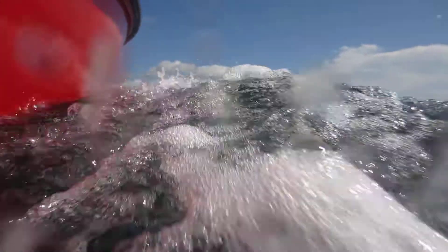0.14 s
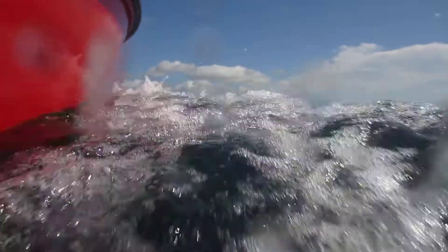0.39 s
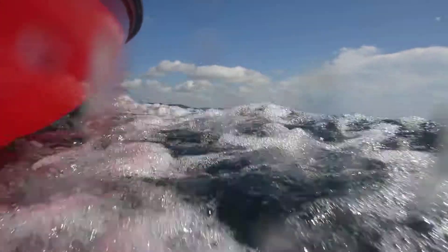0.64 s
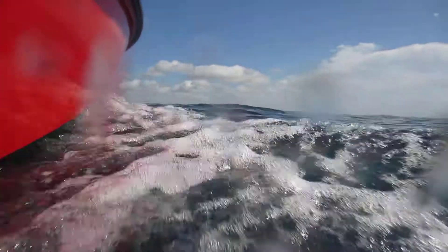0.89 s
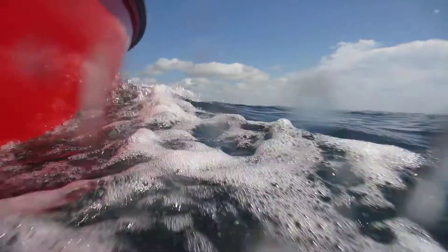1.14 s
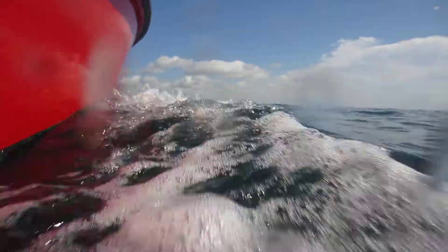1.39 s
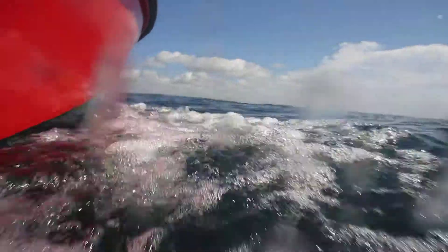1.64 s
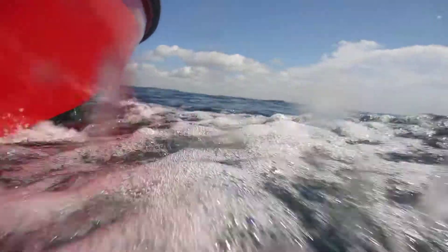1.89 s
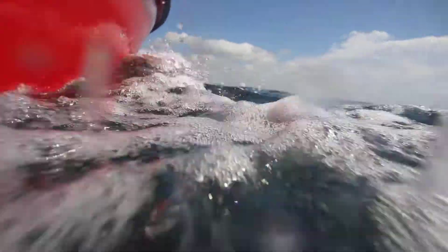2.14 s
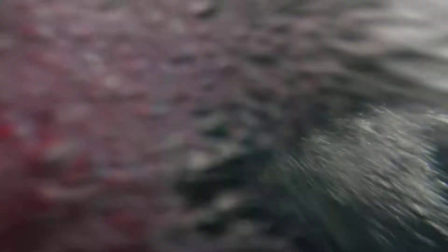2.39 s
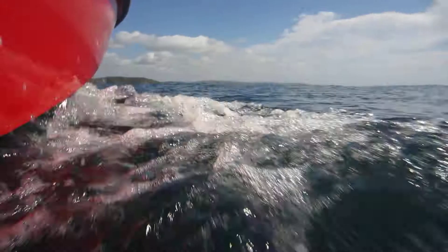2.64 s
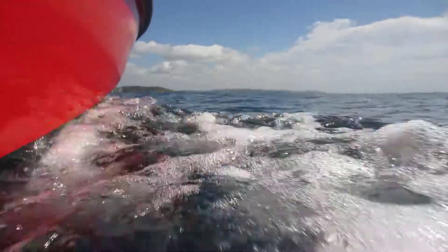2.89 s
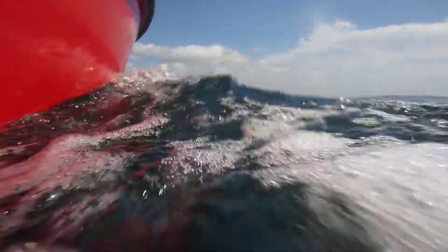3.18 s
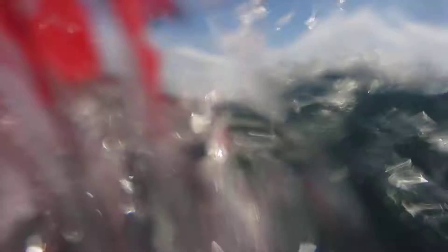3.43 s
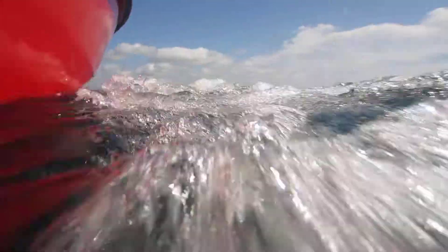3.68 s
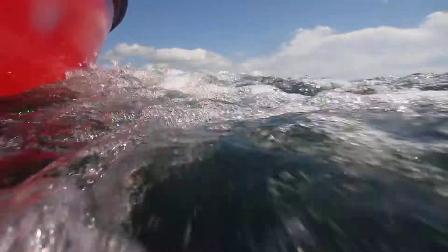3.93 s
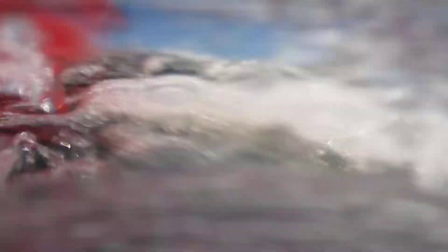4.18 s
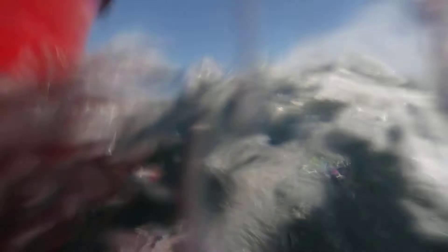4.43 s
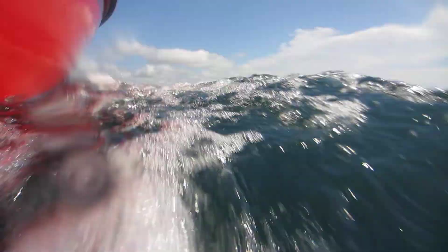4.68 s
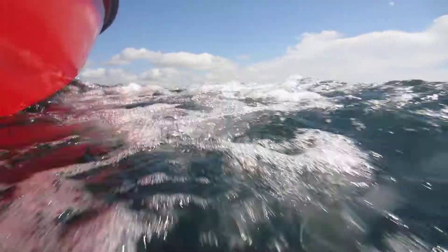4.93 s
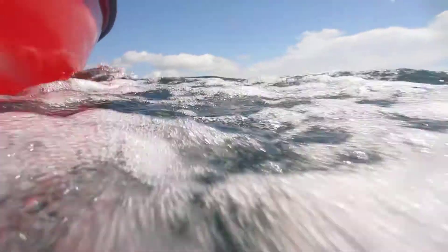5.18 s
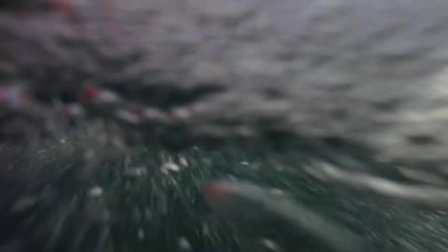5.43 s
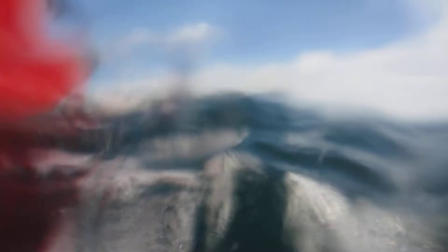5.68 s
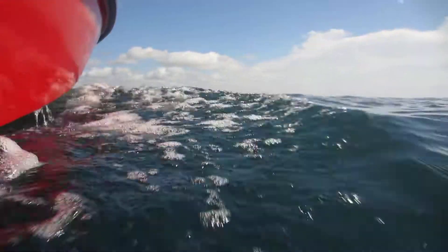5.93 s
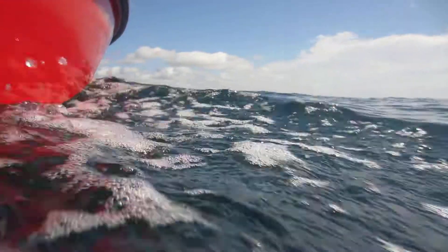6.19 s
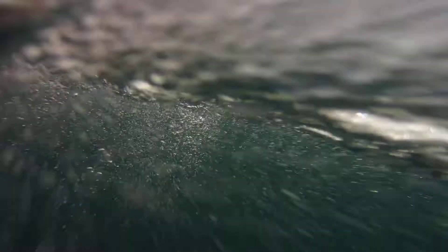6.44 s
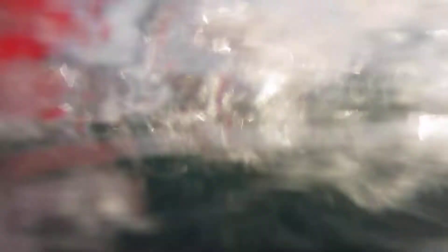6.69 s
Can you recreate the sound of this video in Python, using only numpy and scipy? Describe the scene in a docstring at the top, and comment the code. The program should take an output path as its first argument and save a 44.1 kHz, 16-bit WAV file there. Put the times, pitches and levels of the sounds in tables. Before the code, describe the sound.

Right at the waterline beside a speeding boat, heard from inside a waterproof housing. A low wavering engine hum sits under a steady, foamy rush for two seconds. Then waves hit the housing with hard slaps, short hiss bursts and ringing bubbles. The rush drops much quieter between hits, with droplets trickling. Splashes grow denser, and finally trapped air gurgles at the microphone.

```python
"""Just above the sea beside the hull of a fast boat, heard from inside a waterproof housing.
Coloured noise and foam bubbles make the rush of the bow wave over the engine's wavering orders.
Waves then drench the housing: gusts of hiss, swarms of bubbles, low pushes and single slaps whose
trapped bubbles ring. The rush is much quieter after loud splashes. At the end an air pocket at the
microphone gurgles as a resonator excited by noise."""
import sys
import numpy as np
from scipy import signal
from scipy.fft import rfft, irfft, next_fast_len
from scipy.io import wavfile
from scipy.ndimage import uniform_filter1d

SR = 44100
rng = np.random.default_rng(int(sys.argv[2]) if len(sys.argv) > 2 else 0)


def decibels_to_gain(level_db):
    """Convert a level in decibels to a linear amplitude gain (20 dB per decade)."""
    exponent = np.asarray(level_db, float) / 20
    return 10 ** exponent


def waveform_to_disk(signal):
    """Save audio, clipped to [-1, 1], as 16-bit WAV at the path in sys.argv[1]."""
    frames = np.transpose(np.atleast_2d(signal))
    scaled = np.clip(frames, -1, 1) * 32767
    samples = np.round(scaled).astype(np.int16)
    wavfile.write(sys.argv[1], SR, samples)


N = 301185
BODY, BRIGHT = (800, 3000), (3000, 10000)  # bands that set the levels of rush and waves, Hz


def evened(x):
    """Normalization: scales x to rms 1."""
    return x / np.sqrt(np.mean(x ** 2) + 1e-20)


def read(points, hz):
    """Spectral envelope: interpolates a table on a log-frequency axis."""
    f, value = np.transpose(points)
    return np.interp(np.log(hz + 1), np.log(f + 1), value)


def curve(rows, column):
    """Temporal envelope: one table column at every sample, joined by straight lines."""
    rows = np.array(rows)
    return np.interp(np.arange(N) / SR, rows[:, 0], rows[:, column])


def bumps(modes, hz):
    """Resonance: the summed gain of peaks, each given as (Hz, width Hz, dB)."""
    return sum(decibels_to_gain(db) / np.sqrt(1 + (2 * (hz - f) / width) ** 2) for f, width, db in modes)


def noise(gain, size, patchy_db, flicker_db, span):
    """Turbulence: two unrelated noises of one colour share drifting patches and a wide-band flicker."""
    hz = np.fft.rfftfreq(size, 1 / SR)
    frames = 4 * N // size + 5
    a, b, c, d, patches = rng.standard_normal((frames, len(hz), 5)).T
    # smoothed along both frequency and time
    patches = evened(uniform_filter1d(uniform_filter1d(patches, span, 0), span, 1))
    flicker = evened(uniform_filter1d(rng.standard_normal(frames), size=2))
    unevenness = decibels_to_gain(patchy_db * patches + flicker_db * flicker)
    spectra = np.array([a + 1j * b, c + 1j * d]) * gain(hz)[:, None] * unevenness
    return evened(signal.istft(spectra, nperseg=size, noverlap=3 * size // 4)[1][:, :N])


def bubble(hz, t60, half_climb, soft_s):
    """Damped bubble oscillation: pitch climbs near the surface; complex, to serve both channels."""
    t = np.arange(int(t60 * SR) + 8) / SR
    turns = hz * t * (1 + half_climb * t / t60)  # the pitch climbs by twice this share within t60
    return np.exp(2j * np.pi * turns) * decibels_to_gain(-60 * t / t60) * (1 - np.exp(-t / soft_s))


def bubbles(colour, per_s, cycles, spread_db, low_hz=300, high_hz=14000, count=26):
    """Random superposition: a swarm of ringing bubbles of many pitches, a few of them strong."""
    out = np.zeros((2, N))
    for hz, (u, v) in zip(np.geomspace(low_hz, high_hz, count), rng.random((count, 2))):
        births = rng.random(N) < per_s / count / SR
        strengths = births * decibels_to_gain(spread_db * np.minimum(rng.exponential(1, N), 3))
        grain = bubble(hz, cycles * (.5 + u) / hz, 0.17 * v, 0.8 / hz)
        # equal steps of log frequency cover a bandwidth proportional to hz
        grain = grain / np.linalg.norm(grain) * decibels_to_gain(read(colour, hz)) * np.sqrt(hz)
        out[0] += signal.oaconvolve(strengths, grain.imag)[:N]
        out[1] += signal.oaconvolve(strengths * rng.choice([-1, 1], N), grain.real)[:N]
    return evened(out)


def band_level(x, band):
    """Band-limited level: scales x so that the given band has rms 1 in its first channel."""
    part = signal.sosfilt(signal.butter(4, band, "band", fs=SR, output="sos"), x[0])
    return x / np.sqrt(np.mean(part ** 2))


def split(x, hz):
    """Complementary filtering: parts of x below and above hz, which sum to x."""
    high = signal.sosfiltfilt(signal.butter(2, hz, "high", fs=SR, output="sos"), x)
    return x - high, high


# surges of water over the housing: start_s [s], hold_s [s], force_db [dB],
# brightness_db [dB relative to force], push_db [dB]
SURGES = [(2.178, 0.039, -20, -6.5, -35), (2.286, 0.017, -32.5, -5, -43), (2.338, 0.071, -21, -16.5, -39.5),
          (3.093, .02, -45, -10, -35), (3.156, .02, -41, 0, -28.5), (3.183, 0.029, -25, -4.5, -40),
          (3.264, 0.084, -38.5, -3, -43.5), (3.347, 0.037, -51, -17, -51), (3.599, 0.0065, -39.5, -4, -40),
          (3.633, 0.0034, -64, -14, -38), (3.758, 0.0025, -36.5, -15, -34), (3.815, .004, -49.5, 1, -45),
          (3.889, 0.097, -26.5, -5.5, -28), (4.007, 0.063, -22.5, -7, -29), (4.116, 0.028, -22.5, -2, -25),
          (4.152, 0.0093, -17, -22, -38), (4.22, .02, -30.5, -5.5, -34), (4.26, 0.048, -26, -7, -32),
          (4.338, 0.0083, -33.5, -13, -37), (4.395, 0.18, -45, -5, -53), (5.222, 0.021, -20.5, 0, -25.5),
          (5.28, 0.097, -24, -11, -46), (5.43, 0.036, -25.5, -12.5, -42), (5.485, 0.036, -24, -14.5, -40),
          (5.547, 0.024, -31, -10.5, -38.5), (5.668, 0.027, -34.5, -4.5, -35.5),
          (5.735, 0.031, -40, -13, -58), (6.184, 0.042, -25.5, -7, -36), (6.266, 0.052, -33, -7.5, -42),
          (6.357, .03, -33.5, -8, -40), (6.422, .12, -25, -14, -37), (6.603, 0.16, -32, -15, -46),
          (6.747, .08, -29, -22, -44)]


def surging(levels_db, fall_db_per_s):
    """Energy addition: surges rise fast, hold and drain away; their powers add into one gain."""
    attack_s, attack_db = 0.016, 18.5
    t = np.arange(0, N / SR + .002, .001)
    power = 0
    for (start_s, hold_s, *_), db in zip(SURGES, levels_db):
        early = np.maximum(start_s + attack_s - t, 0)
        late = np.maximum(t - start_s - attack_s - hold_s, 0)
        level_db = db - attack_db * early / attack_s - fall_db_per_s * late
        power = power + (t >= start_s) * decibels_to_gain(level_db) ** 2
    return np.interp(np.arange(N) / SR, t, np.sqrt(power))


# levels of the steady sounds as heard; they fall after loud splashes and slowly recover:
# start_s [s], rush_db [dB], drone_db [dB]
STEADY_LEVELS = [(0.0, -36, -44), (0.69, -42, -37), (0.92, -37, -36.5), (1.14, -38.5, -32.5),
                 (1.8, -41.5, -41.5), (2.07, -36, -37), (2.19, -35, -38), (2.5, -57.5, -63),
                 (2.77, -59, -59), (3.15, -49, -57), (3.44, -59.5, -63), (3.88, -54.5, -50),
                 (4.45, -47, -52), (4.75, -50, -51.5), (5.22, -46.5, -44.5), (5.82, -55, -56),
                 (6.19, -52.5, -55)]
# spectrum of broken water: pitch_hz [Hz], level_db [dB per Hz]
RUSH_COLOUR = [(15, -39), (25, -9), (74, 0.5), (185, -6), (659, -10), (887, -20), (1370, -16), (2760, -29),
               (9320, -39.5), (11900, -67), (16000, -84)]
# resonances of the housing: pitch_hz [Hz], width_hz [Hz], level_db [dB]
HOUSING = [(660, 34, 9), (1270, 140, 14), (1760, 31, 17.5), (3300, 310, 6), (4480, 72, 10.5)]


def rush():
    """Turbulent flow noise: housing-coloured water streams past with fizzing foam and stray droplets."""
    full_db, full_fizz_db = -37, -52  # reference levels of rush and fizz before the first drenching
    fizz_follows = 0.51  # share of the rush's level change, in dB, that the fizz follows
    drips_db, drips_per_s = -62.5, 90
    runoff_db, runoff_db_per_s = -23.5, 66  # droplets left by a surge, relative to its force; fading

    water = noise(lambda hz: decibels_to_gain(read(RUSH_COLOUR, hz)) * (0.87 + bumps(HOUSING, hz)),
                  512, patchy_db=1.4, flicker_db=1.53, span=7)
    foam = bubbles(RUSH_COLOUR, 500, 25, 5.0, low_hz=244.0, high_hz=9120)
    body, fizz = split(water + decibels_to_gain(-15) * foam, 1960)
    drips = bubbles(SPLASH_COLOUR, drips_per_s, 9.4, 4.4, low_hz=1450, high_hz=10300)
    force_db = np.transpose(SURGES)[2]
    dripping = decibels_to_gain(drips_db) + surging(force_db + runoff_db, runoff_db_per_s)

    level_db = curve(STEADY_LEVELS, column=1)
    fizz_db = full_fizz_db + fizz_follows * (level_db - full_db)
    streaming = decibels_to_gain(level_db) * band_level(body, BODY)
    fizzing = decibels_to_gain(fizz_db) * band_level(fizz, BRIGHT)
    return streaming + fizzing + dripping * drips


# engine orders, blurred by the chop: pitch_hz [Hz], width_hz [Hz],
# half_level_db [dB, doubled as the gain is squared]
ENGINE_ORDERS = [(66, 68, -7), (71.4, 17, 2), (92, 12, -6.5), (147, 10, -5)]
# firing rate of the engine: start_s [s], pitch_hz [Hz]
FIRING = [(0, 73.5), (1.2, 75.65), (6.83, 75)]


def drone():
    """Harmonic excitation: a wavering firing tone and its octave within an uneven throb through the hull."""
    hum = noise(lambda hz: bumps(ENGINE_ORDERS, hz) ** 2, 4096, 0.49, 0.49, 5)
    waver_hz = 1.44 * evened(uniform_filter1d(rng.standard_normal(N), 6000))
    turns = np.cumsum(curve(FIRING, column=1) + waver_hz) / SR
    tone = decibels_to_gain(-6.0) * np.sin(2 * np.pi * turns) + decibels_to_gain(-10.5) * np.sin(2 * 2 * np.pi * turns)
    return decibels_to_gain(curve(STEADY_LEVELS, column=2)) * (hum + tone * [[1], [0]])  # the twin has no tone


# single slaps and drops: start_s [s], level_db [dB], pitch_hz [Hz, of the trapped bubble],
# crack_db [dB, bright part relative to 10 dB above the dull part]
DROPS = [(0.599, -20.5, 450, -18), (0.862, -26, 470, -12), (1.095, -18.5, 500, -14),
         (1.838, -17.5, 486, -25), (1.944, -5.5, 636, -29), (1.962, -6, 429, -46), (2.194, -8.5, 1890, -39),
         (2.204, 1, 3150, -6.5), (2.214, 1, 592, -9), (2.237, -1.5, 1580, -49), (2.302, -17, 1260, -22),
         (2.356, -5, 1810, -40), (2.371, -4, 543, -40), (2.421, 2.5, 526, -41), (2.423, -3, 686, -31),
         (2.523, -41, 2500, -8), (2.573, -44, 4800, -3), (2.581, -32.5, 446, -34), (2.643, -32.5, 5820, -6),
         (2.653, -19.5, 584, -26), (2.666, -31, 915, -12), (2.739, -39.5, 4220, 0), (2.908, -26, 670, -21),
         (3.172, -19.5, 1704, -2), (3.195, -3, 2840, -4), (3.224, 0, 1270, -6.5), (3.234, 2.5, 1934, -11),
         (3.291, -21, 1810, 5.5), (3.412, -19, 1250, -33), (3.533, -32, 547, -30), (3.557, -29.5, 560, -21),
         (3.615, -18, 4230, -6), (3.623, -15.5, 1210, 0.5), (3.783, -26.5, 1850, 6.5),
         (3.906, -17.5, 1750, 1), (3.987, -40, 1580, -9), (4.025, -20, 1350, 10), (4.077, -14.5, 2950, 6.5),
         (4.166, 0, 1290, -20), (4.264, -7.5, 1720, -23), (4.318, -13, 3120, -27), (4.362, -16, 3030, -8),
         (4.374, -18, 1300, -28), (4.991, -15.5, 640, -20), (5.119, -23, 666, -30), (5.229, -9.5, 3300, -2),
         (5.239, -1, 3270, -11), (5.265, -9.5, 487, -21), (5.289, 1.5, 776, -18), (5.311, -8.5, 1910, -41),
         (5.369, -10, 2180, -13), (5.431, -1.5, 1300, -20), (5.448, -3.5, 1240, -29),
         (5.462, -4.5, 1730, -12), (5.512, -3, 930, -20), (5.622, -24.5, 600, 2), (5.656, -2, 2166, -16.5),
         (5.691, -16, 4700, -38), (5.694, -1.5, 1355, -11), (5.725, -27, 1340, 6), (5.746, -23, 4480, 4.5),
         (5.754, -28, 4250, 3), (5.792, -33, 7080, -1), (5.807, -30.5, 4400, -7), (5.989, -30, 1430, -7),
         (6.197, -18, 4120, 4.5), (6.213, -1.5, 960, -8), (6.238, -14.5, 2800, 2), (6.252, -19, 624, 6),
         (6.328, -17, 2290, -17), (6.401, -8.5, 2000, -19), (6.412, -10.5, 2700, -8.5),
         (6.428, -0.5, 1105, -26), (6.451, -5, 587, -11.5), (6.489, 1, 602, -26), (6.549, 1, 1595, -32),
         (6.592, -11, 740, -38), (6.622, -9, 458, -25), (6.668, -6, 536, -50), (6.699, -14, 665, -16),
         (6.721, -5.5, 603, -15), (6.756, -8, 1600, -33), (6.81, -7, 556, -51)]


def drops():
    """Impact and entrainment: a short ragged slap is centred on the pitch of the bubble it traps."""
    ring_db, ring_follows = -4.5, 0.77  # bubble under a 0 dB slap; it grows more slowly than the slap
    ring_shrinks_db = 0.07  # dB of ring time lost per dB of weaker slap
    size = 2048
    out = np.zeros((2, N + SR))
    t, f = np.arange(size) / SR, np.fft.rfftfreq(size, 1 / SR)
    colour = decibels_to_gain(read(SPLASH_COLOUR, f))
    bright = colour * f ** 4 / (f ** 4 + 2020.0 ** 4)

    for (start_s, db, hz, crack_db), grit in zip(DROPS, rng.standard_normal((len(DROPS), 2, size))):
        dull = (colour - bright) * (.5 + bumps([(hz, 1.0 * hz, 0)], f))
        slap = 0
        for part, part_db, t60 in ((dull, -6.5, 0.026), (bright, crack_db + 3.5, 0.014)):
            burst = evened(irfft(rfft(grit) * part))
            slap = slap + decibels_to_gain(part_db - 60 * t / t60) * burst
        slap *= 1 - np.exp(-t / 0.0012)  # soft onset

        ring = bubble(hz, (0.014 + 13 / hz) * decibels_to_gain(ring_shrinks_db * db), 0.055, 0.85 / hz)
        sign = np.sign(grit[0, 0])
        both = np.array([ring.imag, 0.53 * sign * ring.real])
        at = int(start_s * SR)
        out[:, at:at + len(ring)] += decibels_to_gain(ring_db + ring_follows * db) * both
        out[:, at:at + size] += decibels_to_gain(db) * slap
    return out[:, :N]


# spectrum of splashing water, for waves, drops and drips: pitch_hz [Hz], level_db [dB per Hz]
SPLASH_COLOUR = [(120, -26), (200, -7), (425, -10), (625, -6), (1080, -4.5), (1810, -4), (4460, -6.5),
                 (6680, -18.5), (8480, -18.5), (12000, -56), (16100, -42)]


def waves():
    """Splash noise: water thrown over the housing hisses in gusts, with small bubbles and coarser plops."""
    drain_db_per_s = 313
    hiss = noise(lambda hz: decibels_to_gain(read(SPLASH_COLOUR, hz)), 256, 0.96, 1.74, 9)
    swarm = bubbles(SPLASH_COLOUR, 800, 22.3, 5.35)
    plops = bubbles(SPLASH_COLOUR, 120, 11.6, 4.6, low_hz=332, high_hz=9230)
    body, bright = split(hiss + decibels_to_gain(1.0) * swarm + decibels_to_gain(-3.5) * plops, 2680)
    _, _, force_db, bright_db, _ = np.transpose(SURGES)
    return (surging(force_db, drain_db_per_s) * band_level(body, BODY)
            + surging(force_db + bright_db, drain_db_per_s) * band_level(bright, BRIGHT))


# spectrum of water pressing on the housing: pitch_hz [Hz], level_db [dB per Hz]
PUSH_COLOUR = [(12, -40.5), (20, -2), (113, 5), (242, -10), (300, -2.5), (390, -36), (660, -120)]


def push():
    """Hydrodynamic pressure: surges press on the housing as lumpy low-frequency noise."""
    ebb_db_per_s = 169
    lumps = noise(lambda hz: decibels_to_gain(read(PUSH_COLOUR, hz)), 512, 4.9, 4.4, 3)
    return surging(np.transpose(SURGES)[-1], ebb_db_per_s) * lumps


# air pocket at the microphone: start_s [s], pitch_hz [Hz], level_db [dB]
POCKET = [(6.42, 506, -28), (6.488, 587, -22), (6.54, 570, -28.5), (6.604, 503, -42), (6.656, 573, -33),
          (6.83, 580, -31)]


def gurgle():
    """Cavity resonance: trapped air rings at one wandering pitch, knocked by the water around it."""
    turn = np.exp(2j * np.pi * np.cumsum(curve(POCKET, column=1)) / SR)
    strength = decibels_to_gain(2.9 * evened(uniform_filter1d(rng.standard_normal(N), 200)))
    knocks = rng.standard_normal((2, N)) * strength
    r = np.exp(-np.pi * 80 / SR)  # two equal poles, each 80 Hz wide, give steep skirts
    # shifted down to 0 Hz, filtered, then shifted back to the wandering pitch
    ring = signal.lfilter([(1 - r) ** 2], [1, -2 * r, r ** 2], knocks / turn)
    fade_in = np.clip((np.arange(N) / SR - POCKET[0][0]) / .007, 0, 1)
    return decibels_to_gain(curve(POCKET, column=2)) * fade_in * evened((turn * ring).real)


# left-right likeness: pitch_hz [Hz], likeness [0 to 1]
SAME = [(60, 0.93), (120, 0.99), (240, 0.96), (480, 0.99), (700, 0.68), (950, 0.11), (1890, 0.6),
        (3770, 0.76), (7520, 0.18), (15000, 0.14)]
# balance: pitch_hz [Hz], level_db [dB, left minus right]
LEFT = [(60, 2), (180, 1), (550, 4.0), (1650, 4.5), (4970, -0.5), (15000, 1)]


def scene():
    """Partial coherence: sources and their twins mix so that left and right share more bass than treble."""
    size = next_fast_len(N)
    hz = np.fft.rfftfreq(size, 1 / SR)
    one, twin = rfft(rush() + drone() + drops() + waves() + push() + gurgle(), size)
    same = np.clip(read(SAME, hz), 0, .999)
    tilt = decibels_to_gain(read(LEFT, hz) / 2)
    shared, apart = np.sqrt((1 + same) / 2) * one, np.sqrt((1 - same) / 2) * twin
    return irfft(np.array([(shared + apart) * tilt, (shared - apart) / tilt]), size)[:, :N]


def roll_off(x):
    """The treble ends steeply here."""
    return signal.sosfilt(signal.butter(12, 16270, fs=SR, output="sos"), x)


def record(dry):
    """Amplitude clipping: the loudest slaps overload the input."""
    mix = np.clip(dry, -1, 1)
    return roll_off(mix)


dry = scene()
out = record(dry)
waveform_to_disk(out)
```